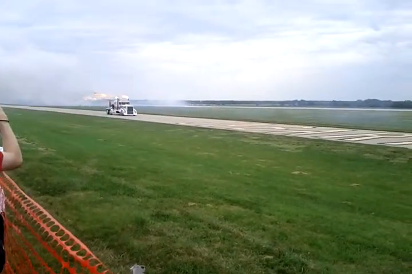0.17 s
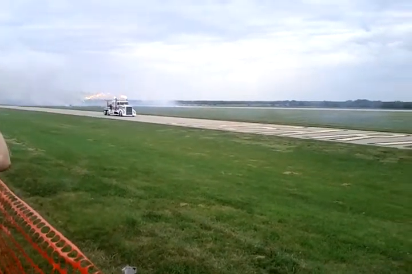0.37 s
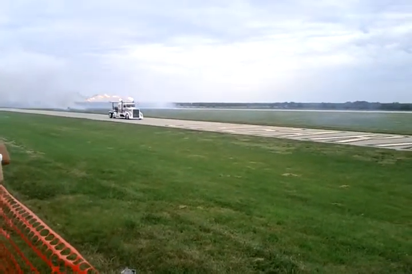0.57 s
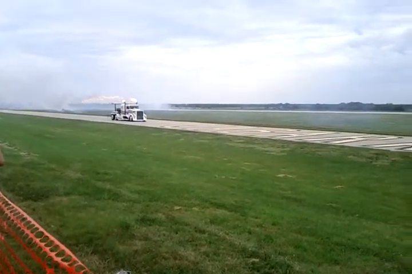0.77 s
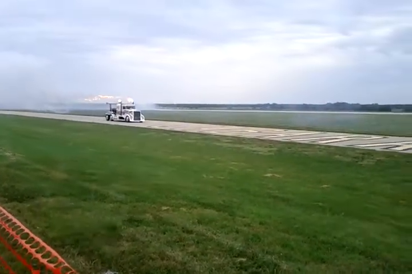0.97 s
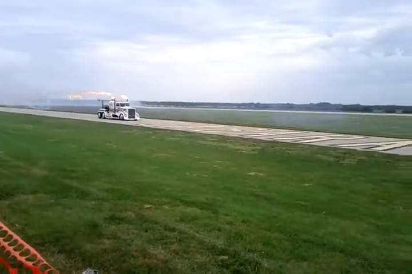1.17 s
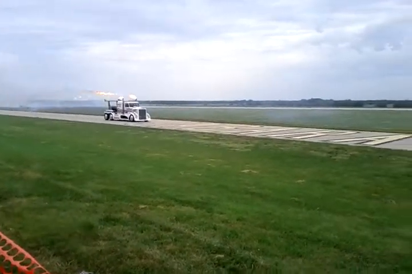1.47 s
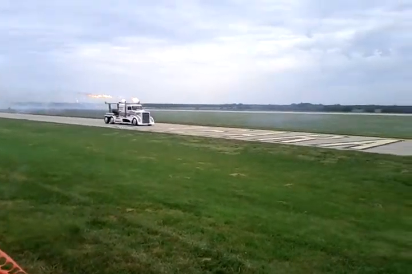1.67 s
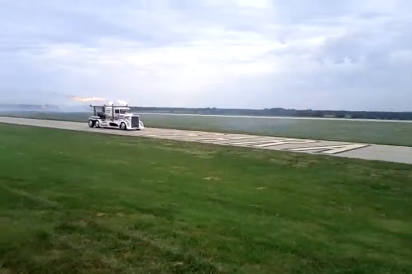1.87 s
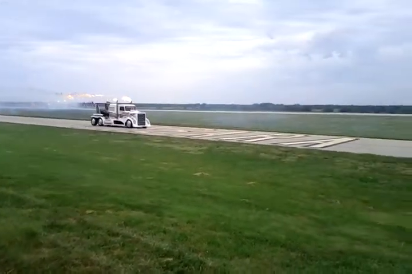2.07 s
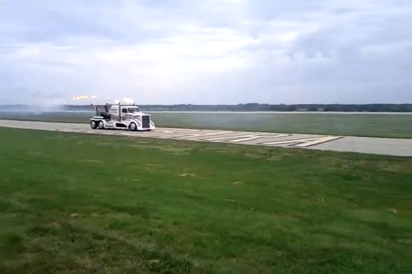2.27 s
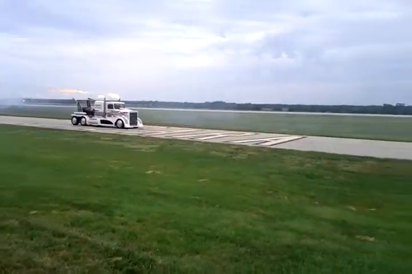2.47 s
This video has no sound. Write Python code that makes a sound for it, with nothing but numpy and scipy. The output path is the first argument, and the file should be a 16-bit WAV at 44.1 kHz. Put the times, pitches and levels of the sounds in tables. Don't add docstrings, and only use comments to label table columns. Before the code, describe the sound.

A jet-powered truck approaches with piercing turbine whine and broad roar, sounding its chime air horn

```python
import sys
import numpy as np
from scipy import signal
from scipy.fft import rfft, irfft
from scipy.io import wavfile

SR = 44100
rng = np.random.default_rng(int(sys.argv[2]) if len(sys.argv) > 2 else 0)


def magnitude_from_level(level_db):
    exponent = np.asarray(level_db, float) / 20
    return 10 ** exponent


def wrap_up_sound(samples):
    columns = np.atleast_2d(samples).T
    tamed = np.clip(columns, -1, 1)
    steps = np.round(tamed * 32767).astype(np.int16)
    wavfile.write(sys.argv[1], SR, steps)


N = 115983
TIME_S = np.arange(N) / SR


def in_time(rows):
    s, *columns = np.transpose(rows)
    return [np.interp(TIME_S, s, column) for column in columns]


def drift(rate):
    step = 40
    pole = np.exp(-2 * np.pi * rate * step / SR)
    settle = 2000
    chance = rng.standard_normal(N // step + settle + 2)
    slow = signal.lfilter([1], [1, -2 * pole, pole * pole], chance)[settle:]
    return np.interp(np.arange(N) / step, np.arange(len(slow)), slow / slow.std())


def tone(turns, db):
    return np.sqrt(2) * magnitude_from_level(db) * np.sin(2 * np.pi * turns)


# t/s, length/s, level change/dB
EDDIES = [(.06, .06, -6), (.4, 0.047, -9), (0.634, .06, -18), (0.97, 0.066, -9), (1.13, .06, -6),
          (1.52, 0.065, -8), (1.697, 0.042, -5), (1.78, .03, 1), (1.899, 0.043, -6), (2.036, 0.062, -15),
          (2.135, 0.028, -4.5), (2.302, 0.035, -12), (2.452, .04, -9), (2.551, 0.039, -13)]


def eddies():
    return sum(depth_db * np.exp(-(2 * (TIME_S - s) / length) ** 2) for s, length, depth_db in EDDIES)


# t/s, level/dB
STAGE = [(0, -45), (1.48, -51), (1.57, -40), (1.7, -56), (1.85, -45), (2.08, -43.5), (2.15, -52),
         (2.22, -28.5), (2.3, -40.5), (2.35, -32), (2.41, -43), (2.49, -33.5), (2.63, -41)]
SHAFT_ORDERS = [6, 20, 51, 40, 22, 23, 25, 37, 49, 60, 54, 71]
FIRST_BLADES = 17
SHIMMER_DB, SHIMMER_PER_S = 1.0, 14
FLUTTER_DB, FLUTTER_PER_S = 1.4, 40


def turbine(speed, rows, order_db, air, eddy_share):
    (hz,), (stage_db,) = in_time(speed), in_time(STAGE)
    blade_db, second_db, fourth_db = in_time(rows)
    second_db = second_db + eddy_share * eddies()
    shaft = np.cumsum(hz * air) / SR / FIRST_BLADES
    blade = FIRST_BLADES * shaft
    out = tone(blade, blade_db + .5 * SHIMMER_DB * drift(SHIMMER_PER_S))
    out = out + tone(2 * blade, second_db + FLUTTER_DB * drift(FLUTTER_PER_S))
    out = out + tone(4 * blade, fourth_db + FLUTTER_DB * drift(SHIMMER_PER_S))
    follows = [0, 0, 0, stage_db] + [second_db] * len(SHAFT_ORDERS)
    for order, rel_db, curve_db in zip(SHAFT_ORDERS, order_db, follows):
        shimmer_db = 1.4 * SHIMMER_DB * drift(7.3)
        out = out + tone(order * shaft + rng.random(), rel_db + curve_db + shimmer_db)
    return out


# t/s, f/Hz
SPEEDS = [
    [(0, 1684), (.4, 1687.5), (1.3, 1691), (1.65, 1690), (2.0, 1687.5), (2.63, 1687.5)],
    [(0, 1615), (1.0, 1617.8), (1.6, 1619.8), (2.63, 1620.5)],
    [(0, 1611.5), (.12, 1608.6), (.3, 1605.9), (.45, 1603.2), (.6, 1599.4), (.86, 1593.3), (1.0, 1588.6),
     (1.6, 1575.5), (2.4, 1558), (2.63, 1555)],
]
# t/s, blade tone level/dB, second harmonic level/dB, fourth harmonic level/dB
TURBINE_A = [(0, -27.5, -39.5, -51), (.33, -27, -40.5, -51.5), (.46, -33.5, -36, -44),
             (.62, -27.5, -41, -52.5), (.88, -26, -33, -42.5), (1.08, -31, -33.5, -36.5),
             (1.18, -39, -36, -49.5), (1.422, -33, -24.5, -35), (1.52, -33, -31.5, -42),
             (1.64, -39, -27.5, -48), (1.82, -43, -31, -37.5), (1.95, -50, -28.5, -37),
             (2.05, -43, -33, -40), (2.17, -24.5, -26.5, -38), (2.28, -25, -30, -43.5),
             (2.4, -24, -31.5, -29), (2.5, -29, -33, -42), (2.63, -25.5, -28.5, -33)]
TURBINE_B = [(0, -28.5, -51.5, -47.5), (.2, -29, -43, -41), (.3, -29, -38, -42), (.42, -26, -45.5, -42.5),
             (.6, -27, -54, -57), (.75, -24, -39, -57), (1.03, -24, -49, -55), (1.22, -28.5, -55, -52),
             (1.45, -40.5, -43.5, -43), (1.61, -33, -40, -40), (1.81, -37.5, -53, -43),
             (1.95, -43, -47.5, -45), (2.05, -33, -44.5, -50), (2.15, -33, -32.5, -49),
             (2.27, -30.5, -44, -49), (2.36, -27.5, -41, -46), (2.46, -32.5, -35.5, -42),
             (2.63, -34, -44, -42.5)]
TURBINE_C = [(0, -29, -44, -51), (.17, -25, -42, -44), (.42, -25, -50, -40), (.57, -22, -46, -49.5),
             (.72, -28.5, -48.5, -49), (.86, -23.5, -44, -46), (1.02, -28, -41, -42), (1.22, -47, -41, -44),
             (1.35, -45, -49, -55), (1.48, -45, -52, -41), (1.63, -27.5, -53, -40), (1.78, -26, -40, -46),
             (1.9, -24.5, -50, -52), (2.1, -33, -44, -55), (2.25, -30, -54, -57), (2.36, -35, -58, -56),
             (2.46, -28, -52, -55), (2.63, -31, -46.5, -51)]
# level/dB
ORDER_DB = [
    [-48, -54.5, -48.5, -3, -17, -22.5, -15.5, -22, -16.5, -18.5, -17.5, -19.5],
    [-45.5, -44.5, -51.5, -9, -15, -15.5, -13, -4.5, -15.5, -7, -11, -10],
    [-54, -45, -55, -13.5, -7.5, -7.5, -8, -13.5, -15, -7, -6, -14],
]


def whine():
    air = 1 + .0003 * drift(13)
    first = turbine(SPEEDS[0], TURBINE_A, ORDER_DB[0], air, 1)
    second = turbine(SPEEDS[1], TURBINE_B, ORDER_DB[1], air, 0)
    third = turbine(SPEEDS[2], TURBINE_C, ORDER_DB[2], air, 0)
    return first + second + third


# t/s, level/dB, treble lift/dB
ROAR = [(0, -36.5, 2.5), (.05, -34, 0.5), (.4, -32, 0.5), (.9, -33, 0), (1.3, -33, 3.5), (1.43, -30, 2.5),
        (1.6, -32.5, 4), (1.97, -31.5, 2.5), (2.17, -32.5, 5.5), (2.29, -31.5, 3), (2.36, -32, 7.5),
        (2.44, -33.5, 7.5), (2.5, -33, 5), (2.63, -32, 5.5)]
# f/Hz, level/dB per Hz
EXHAUST = [
    (30, -79),
    (100, -73),
    (500, -73),
    (555, -63.5),
    (1400, -58.5),
    (2000, -68),
    (5000, -69.5),
    (7200, -67),
]
# f/Hz, width/Hz, lift/dB
HUMPS = [(600, 39, 1), (648, 43, -2), (812, 144, 5.5), (1182, 97, -1), (1680, 310, 6), (2203, 110, 5),
         (2050, 120, -1), (2420, 130, -8.5), (2710, 430, 7), (3000, 150, 1.5), (3395, 295, 7),
         (3995, 760, 4.5), (6170, 450, 4), (6740, 390, 3)]
PATCHY_DB, TOGETHER_DB = 1.2, .35
TREBLE_FROM_HZ = 3060


def roar():
    db, treble_db = in_time(ROAR)
    swell_db, treble_swell_db = db - db.mean(), treble_db - treble_db.mean()
    hz = np.maximum(np.arange(N // 2 + 1) * SR / N, 1)
    exhaust_hz, exhaust_db = np.transpose(EXHAUST)
    shape_db = np.interp(np.log(hz), np.log(exhaust_hz), exhaust_db)
    for top, width, lift_db in HUMPS:
        shape_db = shape_db + lift_db * np.exp(-2 * ((hz - top) / width) ** 2)
    noise = rfft(rng.standard_normal(N)) * magnitude_from_level(shape_db) * np.sqrt(SR / 2)
    out, together_db = 0, TOGETHER_DB * drift(3.7)
    for centre in 20 * 2 ** np.arange(0, 9, 1 / 3):
        overlap = np.clip(1 - 3 * np.abs(np.log2(hz / centre)), 0, 1)
        band = irfft(noise * overlap, N)
        follows = np.clip(np.log2(centre / 300) / 2, 0, 1)
        bright = np.clip(np.log2(centre / TREBLE_FROM_HZ) * 2, 0, 1)
        flicker_db = PATCHY_DB * (0.48 + 0.52 * follows) * drift(10.2) + together_db
        out = out + band * magnitude_from_level(follows * swell_db + bright * treble_swell_db + flicker_db)
    return out


# t/s, sharpness/share of pitch, low chime level/dB, middle level/dB, high level/dB
BLAST = [(.53, 0.019, -29, -31, -38), (.575, 0.019, 5, -19, -6), (.62, 0.01, 4.5, -6.5, -5),
         (.66, 0.0146, -5.5, -8.5, -1), (.70, 0.011, -24, -33, -15), (.785, 0.02635, -9, -30, -33),
         (.82, 0.0125, 6, -9.5, -13), (.86, 0.00856, 1, -1.5, -3.5), (1.0, .003, 0.0, -3, -4),
         (1.35, -0.0024, 3, 0.5, 0.5), (1.8, -0.0016, -2.5, 0.5, 0.5), (2.1, -.001, -3.5, 2.5, 2),
         (2.63, -0.004, -11, -0.5, -1)]
CHIMES = [
    (-88, -33.5, -53, -37),
    (-43, -26.5, -35, -52.5),
    (-44, -29, -55, -50),
]
LATE_PARTIALS = [
    (0, 1),
    (2, 0),
    (1, 2),
]
LATE_S, LATE_DB = 1.395, [-12.5, -8.5, -3]
SAG_S, SAG_DB_PER_S = 1.96, -20
CHIME_HZ, CHIME_SHARP = [271.9, 329.6, 405.9], [.3, 1.0, .7]


def horn():
    out, (sharp, *levels) = 0, in_time(BLAST)
    early = np.clip((LATE_S - TIME_S) / 0.45 + .5, 0, 1)
    for c, (db, partials) in enumerate(zip(levels, CHIMES)):
        turns = np.cumsum(CHIME_HZ[c] * (1 + CHIME_SHARP[c] * sharp)) / SR
        for k, part_db in enumerate(partials):
            bloom_db = 0
            if (c, k) in LATE_PARTIALS:
                bloom_db = LATE_DB[LATE_PARTIALS.index((c, k))] * early
            if (c, k) == LATE_PARTIALS[-1]:
                bloom_db = bloom_db + SAG_DB_PER_S * np.maximum(TIME_S - SAG_S, 0)
            shimmer_db = 0.65 * drift(6.0)
            out = out + tone((k + 1) * turns + rng.random(), db + part_db + bloom_db + shimmer_db)
    return out


def scene():
    return (whine() + roar() + horn())[None]


CAMERA_RATE = 16000
# t/s, length/s, centre f/Hz, half width/Hz
DROPOUTS = [(.8, .09, 465, 30), (.98, .09, 465, 30), (.99, .1, 745, 50), (1.08, .12, 285, 28),
            (1.27, .1, 470, 28), (1.44, .09, 470, 28), (1.6, .46, 470, 30), (1.63, .09, 735, 45),
            (2.4, .09, 480, 22), (1.76, .14, 598, 38), (1.97, .45, 598, 38), (2.05, .09, 280, 28),
            (2.17, .08, 470, 30), (2.48, .12, 595, 36), (.82, .12, 20, 42)]
# t/s, length/s, depth/Hz
TOP_SINKS = [(-.02, .23, 480), (.19, .23, 180), (.37, .045, 450), (.41, .11, 270), (.5, .04, 450),
             (.53, .33, 270), (.84, .14, 350), (.96, .09, 130), (1.27, .22, 230), (1.47, .04, 450),
             (1.91, .04, 450), (1.6, .16, 60), (1.74, .18, 170), (1.79, .04, 450), (2.2, .1, 80),
             (2.29, .04, 350), (2.33, .26, 130)]
SPARSE_HZ, CELL_BINS, CELL_FRAMES, KEPT = 7760, 3, 7, .35


def empty_bands(x):
    limit_hz = CAMERA_RATE / 2
    hz, s, frames = signal.stft(x, SR, nperseg=4096, noverlap=3584)
    gain = np.where(hz < limit_hz - 20, 1.0, 0)[:, None] * np.ones(len(s))
    cells = rng.random((len(hz) // CELL_BINS + 1, len(s) // CELL_FRAMES + 1)) < KEPT
    kept = np.repeat(np.repeat(cells, CELL_BINS, axis=0), CELL_FRAMES, axis=1)
    kept = kept[:len(hz), :len(s)]
    gain = gain * np.where(hz[:, None] > SPARSE_HZ, kept / np.sqrt(KEPT), 1)
    tops = [(start, length, limit_hz, half) for start, length, half in TOP_SINKS]
    for rows, db in ((DROPOUTS, -32), (tops, -60)):
        for start, length, centre, half in rows:
            during = (s > start) & (s < start + length)
            gain[np.ix_(np.abs(hz - centre) < half, during)] = magnitude_from_level(db)
    return signal.istft(frames * gain, SR, nperseg=4096, noverlap=3584)[1][:, :N]


def mirror_image(x):
    image = 2 * x * np.cos(2 * np.pi * CAMERA_RATE * TIME_S)
    return signal.sosfilt(signal.butter(30, 8110, fs=SR, output="sos"), image)


def top_cut(x):
    return signal.sosfilt(signal.butter(12, 9240, fs=SR, output="sos"), x)


def record(dry):
    soft_top, edge_hz = .8, 7110
    x = soft_top * np.tanh(dry / soft_top)
    x = signal.sosfilt(signal.butter(14, edge_hz, fs=SR, output="sos"), x)
    x = empty_bands(x)
    mix = x + mirror_image(x)
    return top_cut(mix)


dry = scene()
out = record(dry)
wrap_up_sound(out)
```